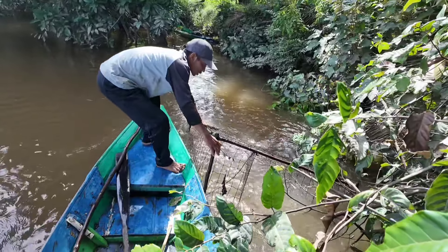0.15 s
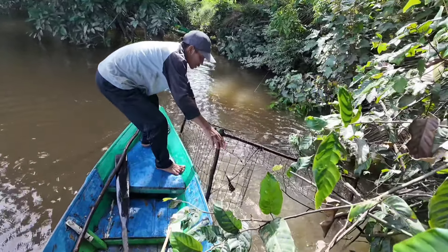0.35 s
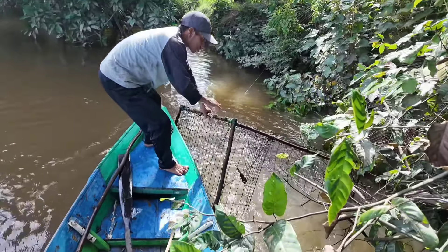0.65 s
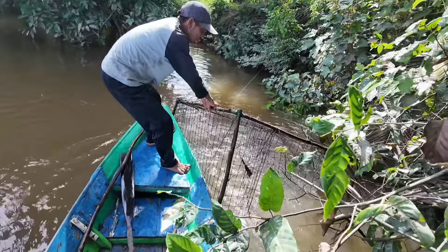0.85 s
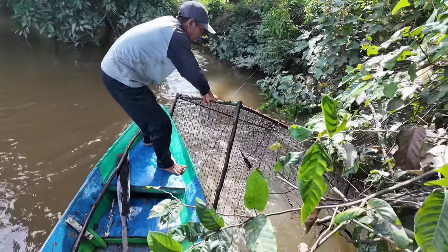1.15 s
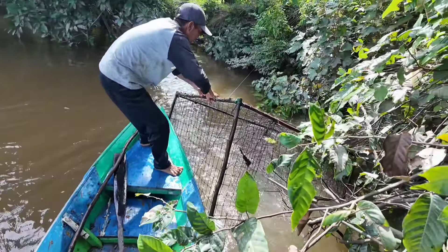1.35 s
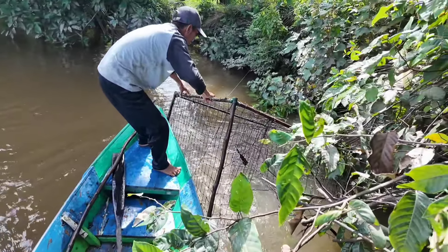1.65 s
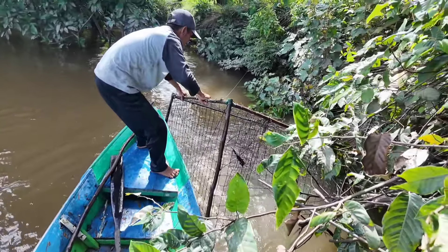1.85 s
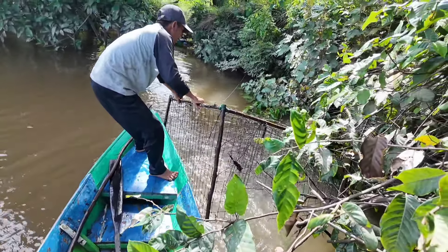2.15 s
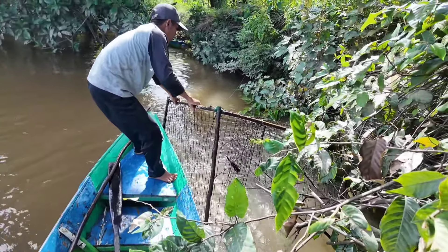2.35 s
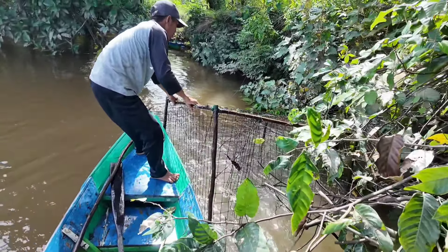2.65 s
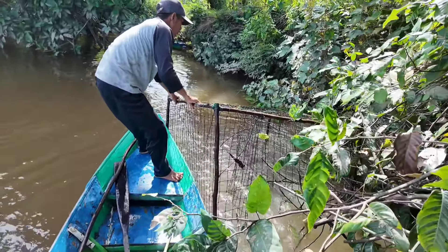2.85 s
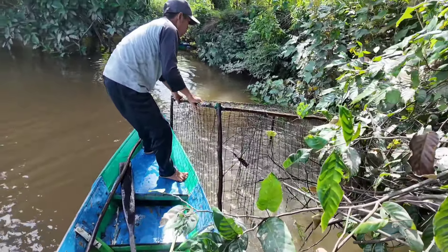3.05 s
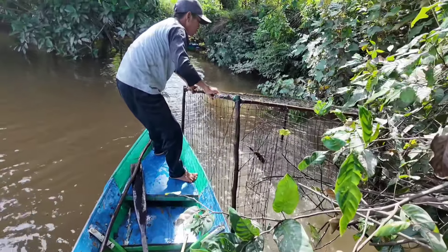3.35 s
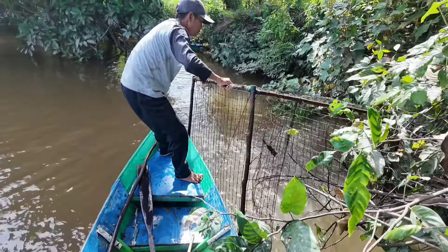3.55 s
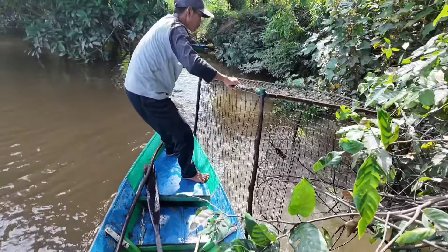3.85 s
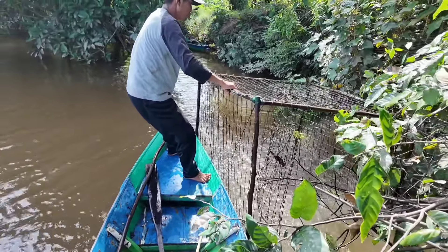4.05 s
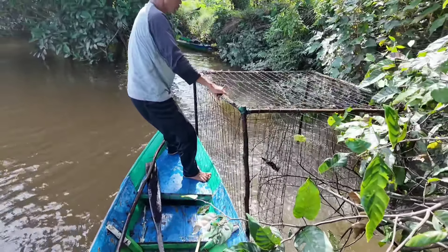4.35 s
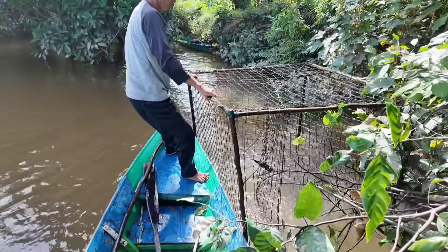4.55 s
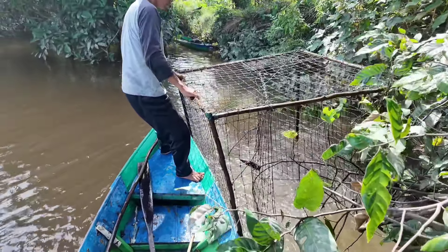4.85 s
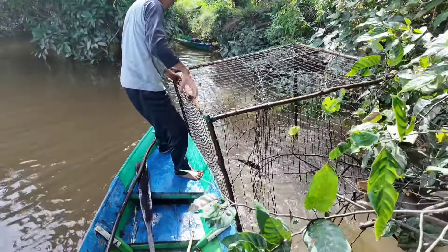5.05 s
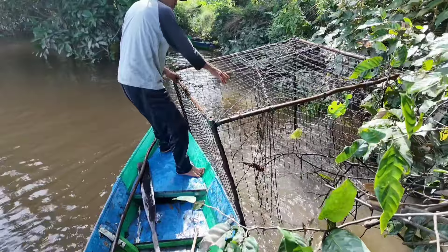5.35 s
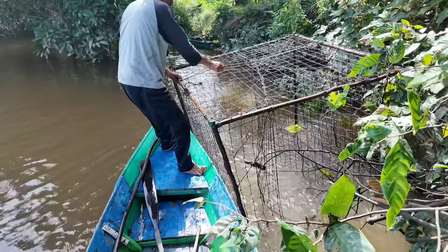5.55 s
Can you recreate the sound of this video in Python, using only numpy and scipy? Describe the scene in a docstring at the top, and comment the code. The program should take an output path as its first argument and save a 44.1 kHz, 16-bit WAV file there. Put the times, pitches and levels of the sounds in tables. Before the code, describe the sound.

A wire-mesh trap scrapes and knocks up a wooden boat's side, booming hollowly, with water hissing, leaves rustling and insects shrilling.

```python
"""Insects shrill over a low rumble and the hiss of water as a wire-mesh fish trap starts up a wooden boat's side.
Filtered noise makes insects, rumble and wet leaves; random slips ring frame modes (scrape) and hull modes (drumming).
Knocks ring both mode sets, dispersed so that each sweeps down from a clack to a boom. Noise bursts make the snaps.
Sines make wire pings, drips, squeaks and a hull groan. A bank echoes the short sounds.
A limiter ducks everything after loud blows."""
import sys
import numpy as np
from scipy import signal
from scipy.fft import rfft, irfft
from scipy.io import wavfile
from scipy.ndimage import uniform_filter1d, minimum_filter1d

SR = 44100
rng = np.random.default_rng(int(sys.argv[2]) if len(sys.argv) > 2 else 0)


def to_wav(sig):
    """Store sig (one row per channel, or 1-D mono) as 16-bit WAV at the path in sys.argv[1].

    Samples outside -1..1 are clipped; the rate is SR.
    """
    pcm = np.clip(np.atleast_2d(sig), -1, 1) * 32767
    pcm = np.round(pcm).astype(np.int16)
    wavfile.write(sys.argv[1], SR, pcm.T)  # frames by channels


N = 251370
TIME_S = np.arange(N) / SR
BIN_HZ = np.fft.rfftfreq(N, 1 / SR)


def amp(db):
    """Decibels to gain."""
    return np.exp(np.asarray(db) * np.log(10) / 20)


def unit(x):
    """Scales to rms 1."""
    return x / np.sqrt(np.mean(x ** 2) + 1e-20)


def read(points, hz):
    """Reads a table on a log-frequency axis."""
    point_hz, value = np.transpose(points)
    return np.interp(np.log(hz + 1), np.log(point_hz + 1), value)


def level(curve):
    """A dB curve as a gain for every sample."""
    return amp(np.interp(TIME_S, *np.transpose(curve)))


def add(mix, start_s, sound):
    """Mixes a sound in at its start time."""
    part = mix[..., max(round(start_s * SR), 0):][..., :sound.shape[-1]]
    part += sound[..., :part.shape[-1]]


def band(x, lo_hz, hi_hz, order=2):
    """Band-pass filter."""
    edges_hz = [lo_hz, min(hi_hz, SR / 2 - 100)]
    return signal.sosfilt(signal.butter(order, edges_hz, "band", fs=SR, output="sos"), x)


def wander(max_hz, count=1):
    """Slow random motion of rms 1, up to about the given rate."""
    step = 64  # samples per point
    size = N // step + 2
    rate_hz = np.fft.rfftfreq(size, step / SR)
    spectrum = rfft(rng.standard_normal((count, size))) / (1 + (rate_hz / max_hz) ** 4)
    slow = unit(irfft(spectrum, size))
    return np.array([np.interp(TIME_S, np.arange(size) * step / SR, row) for row in slow])


def grains(per_s, spread_db):
    """Two trains of random clicks of rms 1, most small and a few large."""
    size = amp(spread_db * np.minimum(rng.exponential(1, (2, N)), 4))
    sign = rng.choice([-1, 1], (2, N))
    struck = rng.random((2, N)) < per_s / SR
    return unit(size * sign * struck)


# left-right likeness: (frequency [Hz], correlation [0-1])
EAR_LIKENESS = [(60, 1), (300, 0.89), (1000, 0.63), (2000, 0.72), (4000, 0.23), (8000, 0.0073), (16000, 0)]


def colour(pair, spectrum):
    """Colours two unrelated signals and blends them so that the ears share the bass; rms 1."""
    a, b = rfft(pair) * amp(read(spectrum, BIN_HZ))
    same = np.clip(read(EAR_LIKENESS, BIN_HZ), 0, 1)
    mid, side = a * np.sqrt(1 + same), b * np.sqrt(1 - same)
    return unit(irfft([mid + side, mid - side], N))


def ring(modes, pitch=1, uneven_db=0, size=8192):
    """Impulse response of a set of modes; the point of contact favours some and starves others."""
    t = np.arange(size) / SR
    share_db = uneven_db * (2 * rng.random(len(modes)) - 1)
    response = np.zeros(size)
    for k, (hz, db, t60_s) in enumerate(modes):
        decay = amp(db + share_db[k] - 60 * t / t60_s)
        response += (-1) ** k * decay * np.sin(2 * np.pi * hz * pitch * t)
    return response


def disperse(x, delay_s_at_1hz):
    """Bending waves run faster at high pitch: delay falls as 1 / sqrt(Hz). Peak 1."""
    hz = np.fft.rfftfreq(2 * len(x), 1 / SR)
    phase = 4 * np.pi * delay_s_at_1hz * np.sqrt(hz)
    bent = irfft(rfft(x, 2 * len(x)) * np.exp(-1j * phase))[:len(x)]
    return bent / abs(bent).max()


def strokes(rows, rise_s, stop_s):
    """Gain for (start, length, level, growth) rows: each rises, grows or fades, then dies away; powers add."""
    power, t = np.zeros(N), np.arange(SR) / SR
    for start_s, length_s, db, growth_db in rows:
        rise = np.minimum(t / rise_s, 1)
        hold = amp(db + growth_db * (np.minimum(t / length_s, 1) - .5))
        stop = np.exp(-np.maximum(t - length_s, 0) / stop_s)
        add(power, start_s, (rise * hold * stop) ** 2)
    return np.sqrt(power)


# chorus spectrum: (frequency [Hz], relative density [dB per Hz])
INSECT_SPECTRUM = [(2000, -31.5), (4900, -26.5), (5600, -11), (6600, -15), (7050, -6), (7480, 3),
                   (8050, -1.5), (8700, -11.5), (10000, -22), (13600, -32), (14400, -13.5), (15300, -12)]
# chorus level before the limiter: (time [s], relative level [dB])
INSECT_LEVEL = [(0, -29.5), (1.8, -25.5), (4.2, -28.5), (5.7, -24)]


def insects():
    """A far chorus: noise in a shrill band with its octave, fluttering slightly."""
    flutter = amp(0.31 * wander(60, count=2))
    chorus = colour(rng.standard_normal((2, N)), INSECT_SPECTRUM) * flutter
    return amp(3.45) * level(INSECT_LEVEL) * chorus * amp([[-.7], [.7]])


# short pulls up the side: (start [s], length [s], relative scrape level [dB], wire rasp level [dB],
# relative hull drumming level [dB], growth over the pull [dB])
HAUL_PULLS = [(0, 0.26, -35.5, -46.5, -23, 10), (0.201, 0.12, -22.5, -40, -13, -1.5),
              (0.328, 0.085, -20.5, -30.5, -26, 6.5), (0.433, 0.22, -17.5, -34, -17.5, 5.5),
              (0.718, .15, -19, -36, -14.5, -1), (0.919, 0.21, -17, -42, -9.5, -4),
              (1.186, 0.079, -13.5, -43, -9, -5), (1.319, .18, -19.5, -47, -10, -1),
              (1.514, 0.19, -48, -53, -17.5, -8), (2.032, 0.31, -33, -58, -35.5, -7),
              (2.632, 0.21, -28, -43, -47, 6), (3.073, .16, -38.5, -57, -38, 4),
              (3.201, 0.18, -21.5, -36, -20, 12), (3.421, 0.33, -14.5, -34, -11.5, 3.5),
              (4, 0.28, -28, -63, -24.5, -2), (4.533, 0.53, -26.5, -58.5, -34, 4),
              (5.062, 0.43, -23, -53, -23, -8)]


def hauling(grip_s=0.035, stop_s=0.05):
    """One envelope shape per pull drives scrape, rasp and hull drumming: linear grip, exponential stop."""
    start_s, length_s, scrape_db, rasp_db, drum_db, growth_db = np.transpose(HAUL_PULLS)
    return [strokes(zip(start_s, length_s, db, growth_db), grip_s, stop_s)
            for db in (scrape_db, rasp_db, drum_db)]


# scrape spectrum: (frequency [Hz], relative density [dB per Hz])
SCRAPE_SPECTRUM = [(150, 3), (330, 2.5), (600, -0.5), (770, 6), (1000, 4), (1600, 2), (2400, -4),
                   (3000, -2.5), (4000, -6), (6000, -14), (16000, -35)]
# trap frame against the hull: (frequency [Hz], relative level [dB], t60 [s]); knocks scale the frequencies
FRAME_MODES = [(556, 1, 0.053), (643.7, 2, 0.039), (760, -10.5, 0.057), (883, -3.5, 0.05),
               (1059, 3.5, 0.021), (1299, 1, 0.033), (1489, -2.5, 0.032), (1624, -9, 0.065),
               (1882, -7, 0.023), (2265, -5, 0.052), (2510, -10.5, 0.019), (3495, -5, 0.056)]


def scrape(sliding, rasping, groups=4, resting_db=-41.5):
    """Wires catch and slip on the gunwale in uneven bursts; frame mode groups flare as the contact moves."""
    slips = grains(700, 2.83) + .5 * rng.standard_normal((2, N))
    slips *= amp(1.85 * wander(79))
    rung = np.zeros((2, N))
    for k in range(groups):
        flaring = slips * amp(4.0 * wander(14))
        response = ring(FRAME_MODES[k::groups], size=4096)
        rung += signal.oaconvolve(flaring, response[None], axes=1)[:, :N]
    rasp = unit(band(slips + .5 * slips[::-1], 2030, 2800))
    contact = np.hypot(sliding, amp(resting_db))  # mesh still leans on the boat between pulls
    body = colour(unit(slips) + 0.56 * unit(rung), SCRAPE_SPECTRUM)
    return amp(-4.0) * contact * body + rasping * rasp


# wooden hull: (frequency [Hz], relative level [dB], t60 [s]); knocks scale the frequencies
HULL_MODES = [(102.4, -21, 0.53), (118, -15.5, 0.49), (144.7, 4.5, 0.2), (166.6, -1, 0.13),
              (233.1, -1.5, 0.2), (284.3, -5.5, 0.062), (370.5, -10.5, 0.12), (505, -16, 0.22)]


def rumble(drumming, resting_db=-46.5):
    """The sliding mesh keeps the hull drumming softly: random clicks ring its modes."""
    rung = signal.oaconvolve(grains(400, 3.9)[0], ring(HULL_MODES))[:N]
    gain = np.hypot(drumming, amp(resting_db))
    return amp(-5.5) * gain * unit(band(rung, 82.2, 345))


# rumble spectrum: (frequency [Hz], relative density [dB per Hz])
SWAY_SPECTRUM = [(10, -22), (35, -41), (50, -20.5), (68, -0.5), (100, 0), (160, -4), (300, -21.5),
                 (1000, -35.5), (4000, -80)]


def sway(drumming, steady_db=-38, rock_db=-24.5, rock_power=.5):
    """Low noise round the boat: a steady part, and a part that swells with each pull."""
    gain = np.hypot(amp(steady_db), amp(rock_db) * drumming ** rock_power)
    return amp(4.5) * gain * colour(rng.standard_normal((2, N)), SWAY_SPECTRUM)


# leaf and water spectrum: (frequency [Hz], relative density [dB per Hz])
RUSTLE_SPECTRUM = [(300, -14), (1000, -6.5), (1900, 0), (3300, 0), (5000, -3), (7000, -7.5), (10000, -5.5),
                   (13500, -10), (15500, -3.5)]
# water leaving the mesh: (time [s], relative level [dB])
RUNOFF_LEVEL = [(0, -38), (1.9, -43.5), (3, -34.5), (4.4, -32.5), (5.7, -25.5)]
# wet mesh sweeping leaves: (start [s], length [s], relative level [dB], growth over the sweep [dB])
LEAF_SWEEPS = [(0.33, 0.065, -23.5, 3.5), (0.52, 0.12, -22, -7.5), (0.72, 0.33, -34, -1),
               (1.2, 0.048, -25, 0.5), (1.29, 0.3, -35, -8), (2.06, 0.41, -40, -8), (2.6, 0.16, -27.5, 1),
               (2.8, 0.052, -23.5, -7), (3.07, 0.25, -26, 4.5), (3.41, 0.32, -30, 7.5),
               (4.13, 0.11, -28.5, -1), (4.32, 0.074, -24, -4.5), (4.55, 0.14, -20, -2),
               (4.75, 0.11, -16.5, -5.5), (4.91, 0.21, -17.5, 5.5), (5.18, 0.26, -23, 5)]


def rustle(rise_s=0.026, settle_s=0.093):
    """Leaves, wet mesh and running water: dense fine ticks over a soft hiss."""
    ticks = grains(2500, 1.9) + 1.23 * rng.standard_normal((2, N))
    ticks *= amp(1.67 * wander(30))
    gain = np.hypot(strokes(LEAF_SWEEPS, rise_s, settle_s), level(RUNOFF_LEVEL))
    return amp(3.0) * gain * colour(ticks, RUSTLE_SPECTRUM) * amp([[-.5], [.5]])


# frame strikes boat: (time [s], hull boom peak [dB], frame clack peak [dB], clack centre [Hz],
# chatter [0-1], factor on mode frequencies [ratio])
HULL_KNOCKS = [(0.1533, 2, -10.5, 950, .6, 0.94), (0.22, -13, -27, 550, 0.2, 0.68),
               (0.251, -23, -12.5, 1520, 0.35, 1.15), (0.3445, -38, -11.5, 1440, .75, 1.18),
               (0.416, -5, -15, 1185, 0.6, 0.95), (0.45, -13, -10.5, 1080, 0.5, 0.79),
               (0.4669, 4.5, 1, 1150, 0.15, 1.04), (0.494, -2.5, -30, 600, 0.15, .81),
               (0.556, 2, -9, 1100, .7, .98), (0.991, 10.5, -6.5, 1000, .06, .96),
               (1.212, -5.5, -2, 1140, 0.06, 0.85), (1.369, -13.5, -27, 600, 0.5, 1.35),
               (1.432, -2, -10.5, 580, 0.13, 0.9), (1.555, -11.5, -26, 600, 0.15, 0.84),
               (1.632, -16, -48, 470, .3, 1.12), (1.706, -15, -46, 500, .3, 0.82),
               (2.3256, -29, -18, 1804, 0.38, 0.9), (2.691, -42, -13, 860, 1, 0.87),
               (2.756, -32.5, -17, 900, 0.12, .95), (2.821, -36, -9, 1674, 0.7, 1.08),
               (2.838, -34, -10.5, 1010, 0.36, 0.88), (3.202, -18.5, -31, 1200, 0.7, .85),
               (3.3696, 4, .5, 900, 0.2, 1.024), (3.48, 3.5, -6.5, 1490, 0.14, 1.09),
               (3.575, -4, -11, 960, 0.7, 0.91), (3.652, -9.5, -12, 1000, .9, 0.78),
               (3.7011, 12.5, 12.5, 900, 0.01, 0.99), (3.710, -21, 4, 513, 0.04, 1.07),
               (4.194, -13, -18, 600, 0.4, 1.02), (5.160, -17, -28, 900, .14, 1.22),
               (5.409, -16.5, -43, 1500, 0.5, 0.93), (5.521, -32, -12.5, 1430, 0.03, 1.22)]


def knocks(size=4096, delay_s_at_1hz=.23):
    """Each blow rings frame and hull, spread in time by the planks; the loose frame chatters after it."""
    out, t = np.zeros(N), np.arange(size) / SR
    for start_s, boom_db, clack_db, centre_hz, chatter, pitch in HULL_KNOCKS:
        rattles = rng.choice([-1, 1], size) * (rng.random(size) < 600 / SR)  # 600 per s
        contact = chatter * rattles * np.exp(-t / 0.028)
        contact[0] = 1
        frame = ring(FRAME_MODES, pitch, uneven_db=4.5, size=size)
        clack = band(signal.fftconvolve(frame, contact)[:size], centre_hz / 1.76, centre_hz * 1.83)
        boom = band(ring(HULL_MODES, pitch, uneven_db=3.25), 71, 920, order=1)
        add(out, start_s, amp(boom_db) * disperse(boom, 0.65 * delay_s_at_1hz))
        add(out, start_s, amp(clack_db) * disperse(clack, delay_s_at_1hz))
    return np.array([out, out])


# echo off water and foliage: (frequency [Hz], t60 [s])
BANK_DECAY = [(100, 0.34), (500, 0.092), (2000, 0.034), (8000, 0.069), (16000, 0.092)]


def bank(x, size=16384):
    """A short scattered echo from the water and leafy bank: noise decaying at its own rate per band."""
    hz, t, noise = signal.stft(rng.standard_normal((2, size)), SR, nperseg=256)
    decay = amp(-60 * t / read(BANK_DECAY, hz)[:, None])
    tail = signal.istft(noise * decay, SR, nperseg=256)[1]
    tail *= np.minimum(np.arange(tail.shape[1]) / SR / 0.0035, 1)  # 3.5 ms onset
    echo = signal.fftconvolve(x, tail / np.linalg.norm(tail[0]), axes=1)[:, :N]
    return band(echo, 320, 18000)


# twigs and wires snap: (time [s], peak level [dB], centre [Hz], crack t60 [s],
# spray re crack [dB], left over right [dB])
TWIG_SNAPS = [(0.258, -9.5, 3500, 0.031, 9, -0.5), (0.418, -8, 5900, 0.017, -4, 13),
              (0.58, -6.5, 4520, 0.016, 8, 2), (1.2498, -8, 3003, 0.022, -11, 8),
              (1.3406, -8, 4100, 0.032, -10, 5), (1.889, -25.5, 2880, 0.012, -3, 3),
              (2.332, -16, 3610, 0.015, -10, -5), (2.61, -9.5, 4870, 0.075, -3, -1.5),
              (2.825, -10, 2560, 0.055, 6, -5), (4.169, 17, 9950, 0.0087, -25, -6.5),
              (4.956, -0.5, 3800, 0.0091, 8, -1.5), (5.0861, 9.5, 3350, 0.056, -1, -2.5),
              (5.1927, 4.5, 4660, 0.017, -19, -3)]


def snaps(spray_t60_s=0.21):
    """A short noise crack, with a longer spray of shaken leaves and drops."""
    out, t = np.zeros((2, N)), np.arange(8000) / SR
    for start_s, db, hz, t60_s, spray_db, pan_db in TWIG_SNAPS:
        shape = amp(-60 * t / t60_s) + amp(spray_db - 60 * t / spray_t60_s)
        burst = rng.standard_normal((2, len(t))) * shape
        crack = band(burst, hz - 2200 * hz / (hz + 1800), hz + 1600, order=1)
        crack /= abs(crack).max(axis=1, keepdims=True)
        add(out, start_s, amp(db) * crack * amp([[min(pan_db, 0)], [min(-pan_db, 0)]]))
    return out


# taut wires ping: (time [s], upper note level [dB], upper note [Hz], t60 [s])
WIRE_PINGS = [(0.364, -17.5, 1763, 0.047), (0.384, -20, 1890, 0.053), (1.252, -12.5, 2800, 0.028),
              (1.889, -30, 2840, 0.033), (2.33, -24.5, 1740, 0.074), (2.333, -23, 3770, 0.043),
              (2.415, -37, 2020, .09), (5.337, -24, 2300, 0.082)]


def pings():
    """Each wire rings with two decaying notes, the lower at 0.9 of the upper and stronger."""
    out, t = np.zeros(N), np.arange(6000) / SR
    for start_s, db, hz, t60_s in WIRE_PINGS:
        pair = np.sin(2 * np.pi * hz * t) - 1.3 * np.sin(2 * np.pi * hz * 0.9 * t)
        add(out, start_s, amp(db - 60 * t / t60_s) * pair)
    return np.array([out, out])


def drips(count=170, first_s=2):
    """Water runs off the mesh into the river as many small, short-lived bubbles of rising pitch."""
    out, t = np.zeros((2, N)), np.arange(1500) / SR
    for when, pitch, size, side in rng.random((count, 4)):
        hz = 750 * 4 ** pitch
        bubble = np.sin(2 * np.pi * hz * t * (1 + 2 * t)) * np.exp(-t * hz / 6)
        start_s = first_s + (N / SR - first_s) * when
        ears = np.array([[1.5 - side], [.5 + side]])
        add(out, start_s, amp(-33 - 12 * size) * bubble * ears)
    return out


# pressed wire slides: (start [s], length [s], level before flutter [dB], start pitch [Hz], end pitch [Hz])
WIRE_SQUEAKS = [(2.11, 0.13, -36.5, 1142, 1075), (3.288, 0.067, -29, 2350, 2170),
                (3.31, 0.0487, -28, 1607, 1470), (3.54, 0.15, -23.5, 1002, 1085)]


def squeaks(jitter_ratio=0.0285, flutter_db=3.5):
    """Stick-slip on one wire: a rough, fluttering tone that glides a little."""
    out = np.zeros(N)
    jitter = 1 + jitter_ratio * wander(114)[0]
    flutter = amp(flutter_db * wander(70)[0])
    for start_s, length_s, db, start_hz, end_hz in WIRE_SQUEAKS:
        hz = np.interp(TIME_S, [start_s, start_s + length_s], [start_hz, end_hz]) * jitter
        gain = strokes([(start_s, length_s, db, 0)], rise_s=0.014, stop_s=0.007)
        out += gain * flutter * np.sin(2 * np.pi * np.cumsum(hz) / SR)
    return np.array([out, out])


# hull under load: (start [s], length [s], rms level [dB])
HULL_GROAN = (2.82, .25, -30)


def groan(hz=65.):
    """The boat's slowest bending mode hums briefly, pitch wavering, as the weight comes onto it."""
    turns = np.cumsum(hz * (1 + 0.043 * wander(13)[0])) / SR
    gain = strokes([(*HULL_GROAN, 0)], rise_s=.06, stop_s=.035)
    return gain * unit(np.sin(2 * np.pi * turns))


def from_right(x, count):
    """A source to the right reaches the left ear a few samples late."""
    return np.array([np.pad(x[0], (count, 0))[:N], x[1]])


def scene():
    """The trap to the right, the echo of its short sounds, the boat and the insects."""
    sliding, rasping, drumming = hauling()
    blows = knocks()
    small = snaps() + pings() + squeaks() + drips()
    brushing = small + scrape(sliding, rasping) + rustle()
    trap = from_right(blows, count=1) + from_right(brushing, count=3)
    echo = amp(-9.5) * bank(blows + small)
    boat = rumble(drumming) + groan() + sway(drumming)
    return trap + echo + boat + insects()


def record(dry, ceiling=.97, recovery_db_per_s=4.08, edge_hz=15650):
    """A limiter drops the gain just ahead of each peak and recovers slowly; then a low-pass."""
    over_db = 20 * np.log10(np.maximum(abs(dry).max(0) / ceiling, 1))
    recovery_db = recovery_db_per_s * TIME_S
    duck_db = np.maximum.accumulate(over_db + recovery_db) - recovery_db
    gain = uniform_filter1d(minimum_filter1d(amp(-duck_db), size=129), size=129)
    low_pass = signal.firwin(511, edge_hz, window=("kaiser", 9), fs=SR)
    return signal.oaconvolve(dry * gain, low_pass[None], "same")


dry = scene()
out = record(dry)
to_wav(out)
```